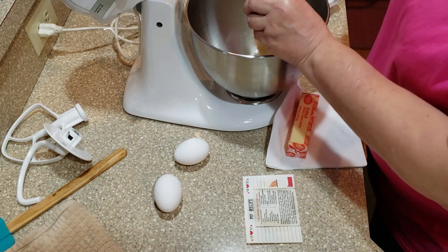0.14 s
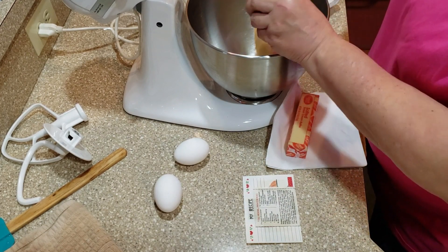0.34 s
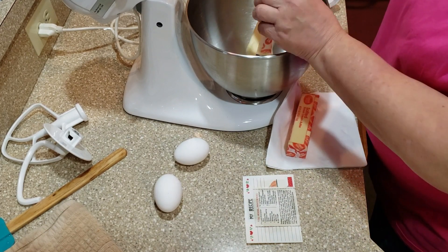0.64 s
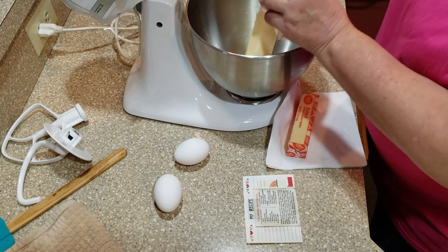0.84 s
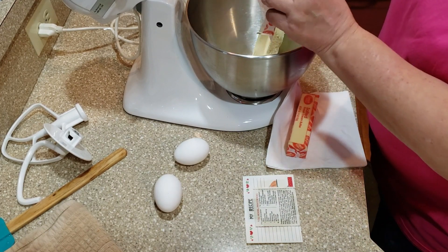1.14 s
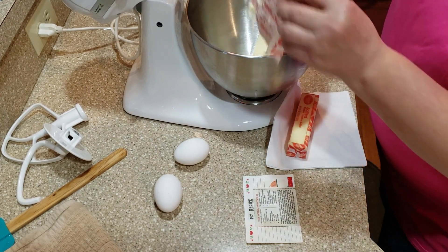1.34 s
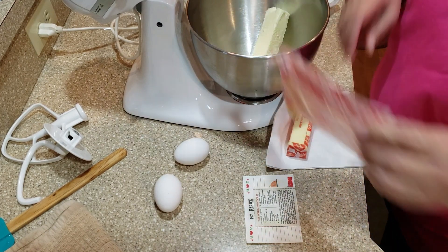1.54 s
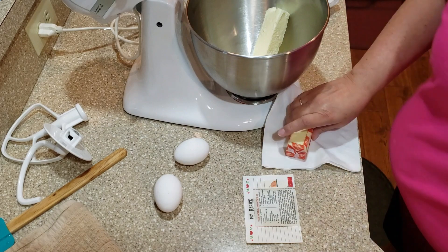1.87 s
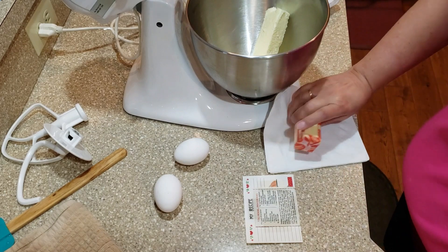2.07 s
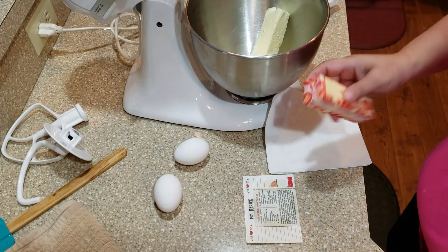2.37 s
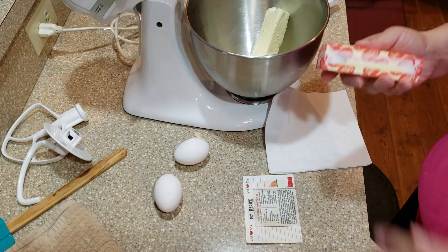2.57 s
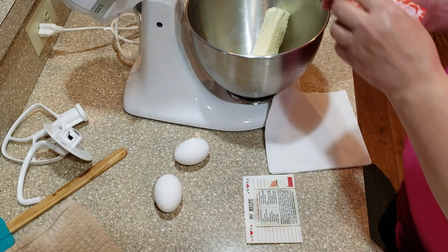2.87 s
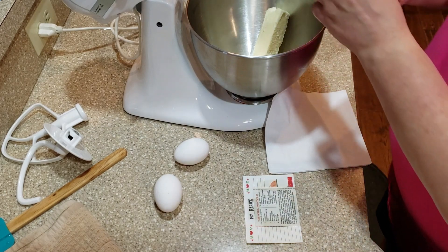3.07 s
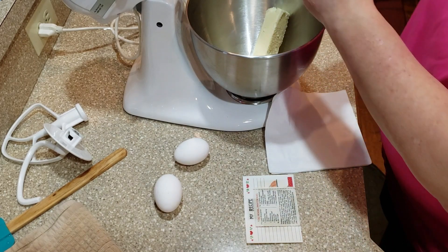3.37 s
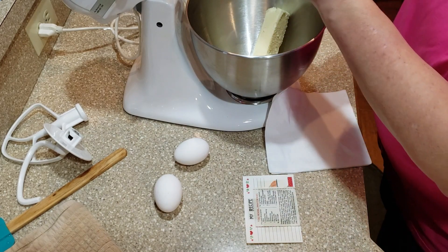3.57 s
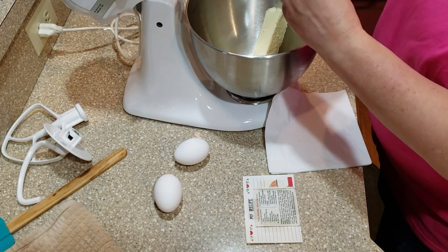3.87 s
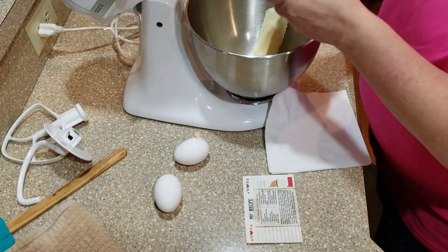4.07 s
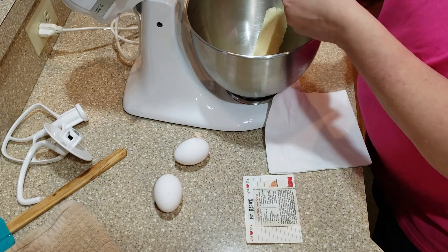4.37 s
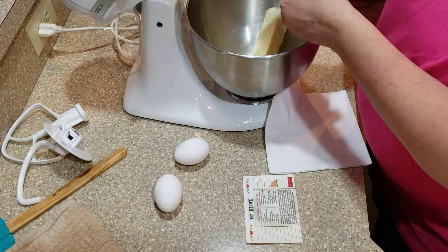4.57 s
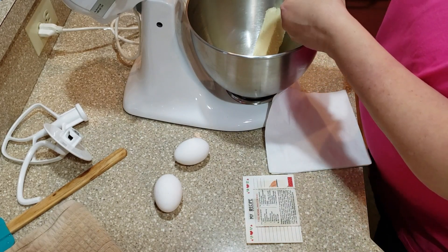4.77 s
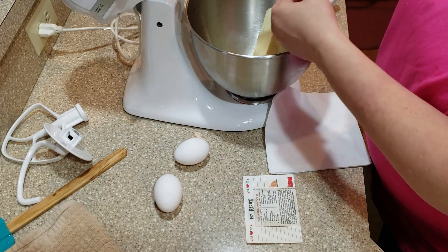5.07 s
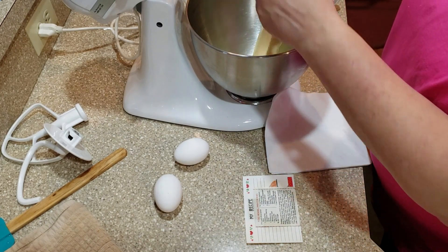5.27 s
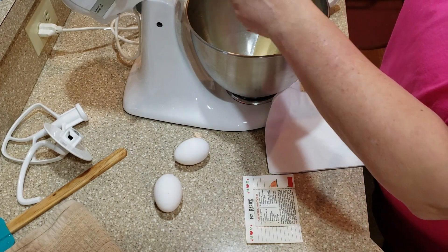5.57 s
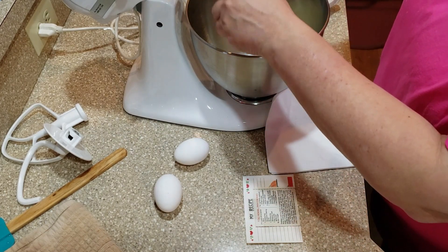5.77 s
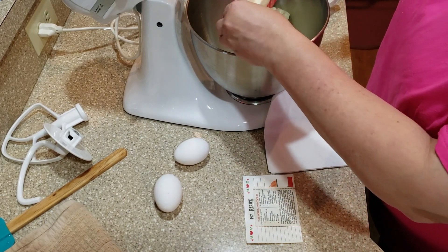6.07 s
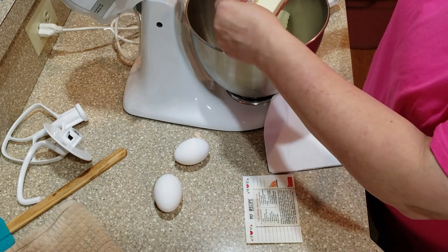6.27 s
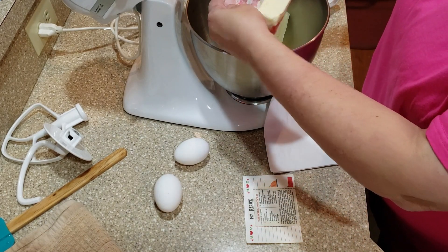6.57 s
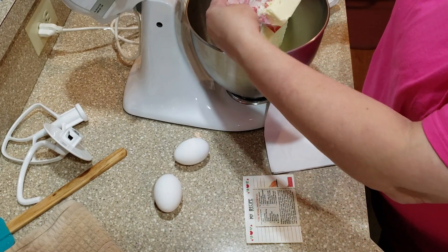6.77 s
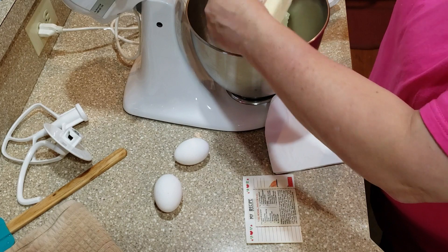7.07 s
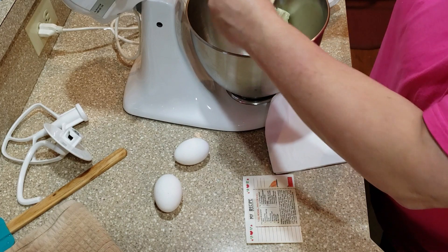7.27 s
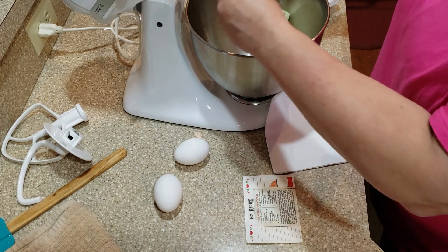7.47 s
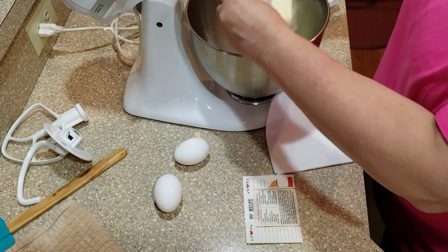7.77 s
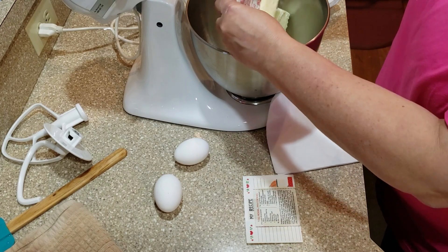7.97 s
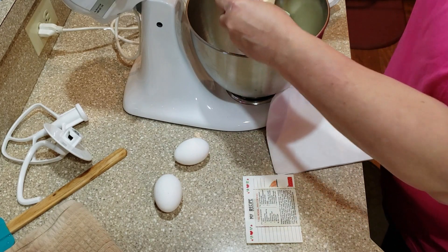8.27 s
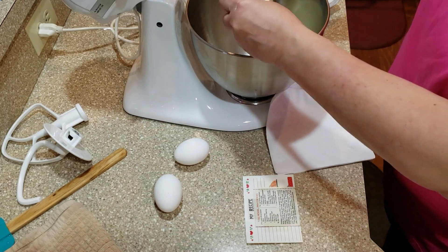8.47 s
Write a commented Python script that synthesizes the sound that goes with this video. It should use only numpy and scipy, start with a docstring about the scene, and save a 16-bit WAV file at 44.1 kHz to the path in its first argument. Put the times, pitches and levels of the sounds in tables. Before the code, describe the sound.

Close by in a small kitchen, a butter wrapper crackles briefly, then eases into a dull bump and light papery swishes. The peeling resumes in irregular bursts of crisp clicks and rustling, with tiny pops as the waxed paper lets go. In the second half the butter nudges a steel bowl several times with soft, hollow knocks. The bowl faintly colours the crinkling, and a low appliance hum runs underneath.

```python
"""Sharp snaps over a fine rustle: waxed paper peeled off butter above a steel mixing bowl.
Creases buckle in bursts of clicks that ring facets, flap the sheet and make the wax fizz.
The paper hisses as it slides and pops off the tacky butter; the stick bumps and knocks the bowl.
The bowl colours the paper, a small kitchen rings briefly and an appliance hums throughout."""
import sys
import numpy as np
from scipy import signal
from scipy.fft import rfft, irfft, next_fast_len
from scipy.io import wavfile

SR = 44100
rng = np.random.default_rng(int(sys.argv[2]) if len(sys.argv) > 2 else 0)


def inscribe(sig):
    """Save sig as 16-bit PCM at rate SR to the path in sys.argv[1].

    A 1-D sig is mono; a 2-D sig holds one channel per row.
    Samples are clipped to [-1, 1] before scaling.
    """
    pcm = np.round(np.clip(np.atleast_2d(sig).T, -1, 1) * 32767)
    wavfile.write(sys.argv[1], SR, pcm.astype(np.int16))


N = 380583
TIME = np.arange(N) / SR

# loudest creases buckling: (time [s], level [dB], facet [Hz], flap [rel dB], fizz [rel dB])
CREASES = [(0.06, -45.5, 1880, -9, -8.5), (0.182, -39.5, 1527, -5.5, -26), (0.192, -37, 1615, -11, -3),
           (0.305, -39.5, 1702, -11, -12), (0.367, -38.5, 985, -13, -18.5), (0.377, -31, 1770, -13, -11),
           (0.614, -34, 3760, -16, -3.5), (0.705, -33.5, 3176, -17, -7), (0.716, -36, 2030, -4, -1),
           (0.739, -38.5, 1330, -5.5, -7), (2.225, -45, 3626, -25, 5.5), (2.233, -42.5, 1890, -7, -20),
           (2.324, -41, 2620, -19, 1), (3.568, -39, 7010, -19.5, 7.5), (3.69, -41.5, 5560, -23, -15),
           (3.756, -38.5, 2617, -15.5, -5), (4.282, -43, 1020, -5, -15), (4.31, -47, 2890, -13, -2),
           (4.453, -40.5, 3820, -34, -8), (4.489, -40, 2675, -9.5, -6.5), (4.772, -47.5, 4100, -16, 6.5),
           (4.801, -40, 4540, -14, -3), (4.813, -43.5, 2990, -10, 0), (4.886, -38.5, 2880, -11.5, -4.5),
           (4.935, -35, 1250, -9.5, -24), (4.958, -37.5, 2920, -3.5, -2.5), (4.971, -37.5, 1010, -5, -4),
           (5.01, -36, 1840, -12, -14), (5.151, -36.5, 1700, -14, -2), (5.359, -34.5, 2345, -13, 0.5),
           (5.372, -38.5, 3584, -7.5, -2), (5.525, -46, 3550, -34, 5.5), (5.583, -48.5, 3430, -20, 1),
           (5.634, -49.5, 3240, -14, 2.5), (6.041, -42, 2850, -18.5, -8), (6.268, -36.5, 3480, -5.5, 1),
           (6.19, -45, 2202, -7.5, -8), (6.637, -35, 1374, -6, -8), (6.65, -49.5, 1910, -5, -3),
           (6.73, -42, 2450, -5, -10), (6.846, -44.5, 2512, -6, -12), (6.934, -37.5, 1850, -12.5, -6),
           (6.951, -37.5, 4040, -9.5, 3), (7.044, -31.5, 1347, -9.5, -3), (7.117, -33, 1520, -10.5, -6.5),
           (7.132, -42, 1980, -15, -4), (7.197, -36, 1196, -23, 1.5), (7.263, -31, 6390, -40, -22.5),
           (7.353, -43, 3700, -4, -5.5), (7.772, -37.5, 4170, -10.5, -2), (7.905, -36, 4037, -10.5, 2.5),
           (8.18, -48, 1803, -9, -5), (8.242, -41, 1918, -12, -1.5), (8.305, -37.5, 1440, -6.5, -15.5),
           (8.386, -38.5, 1690, -13, -4), (8.396, -41, 2100, -14, -6), (8.413, -40.5, 1213, -8, -2.5),
           (8.427, -46, 2004, -12, -4), (8.526, -42.5, 2700, -11.5, -10)]
# wrapper position and sheet pitch: (time [s], left minus right [dB], sheet [Hz], depth in bowl [dB])
WRAPPER = [(1, 4.5, 710, 8.5), (2.2, 1.5, 819.5, 6.5), (3.7, 2.5, 850, -2), (4.5, 3, 400, -11),
           (5.15, 2, 422.3, 0.5), (6, 3, 430, -5)]


def from_db(db):
    """Decibels to gain."""
    return 10 ** (np.asarray(db) / 20)


def unit_rms(x):
    """Scale to rms 1."""
    return x / np.sqrt(np.mean(x ** 2) + 1e-20)


def unit_energy(x):
    """Scale each channel to energy 1."""
    return x / np.sqrt(np.sum(x ** 2, axis=-1, keepdims=True) + 1e-20)


def curves(rows):
    """Interpolate each column over the time in the first."""
    times_s, *columns = np.transpose(rows)
    return [np.interp(TIME, times_s, column) for column in columns]


def band(x, low_hz, high_hz, order=2):
    """Causal band-pass."""
    sos = signal.butter(order, [low_hz, min(high_hz, .45 * SR)], "band", fs=SR, output="sos")
    return signal.sosfilt(sos, x + 1e-18)


def resonate(x, hz, width_hz):
    """Resonator, peak gain 1."""
    r = np.exp(-np.pi * width_hz / SR)
    feedback = [1, -(1 + r * r) * np.cos(2 * np.pi * hz / SR), r * r]
    return signal.lfilter(np.array([1, 0, -1]) * (1 - r * r) / 2, feedback, x + 1e-18)


def drift(rate_hz):
    """Slow random curve, rms 1."""
    knots = rng.standard_normal(int(rate_hz * N / SR) + 2)
    return unit_rms(np.interp(TIME * rate_hz, np.arange(len(knots)), knots))


def coloured_noise(spectrum):
    """Steady noise of a given spectral shape, rms 1."""
    hz, db = np.transpose(spectrum)
    size = next_fast_len(N, real=True)
    bins_hz = np.fft.rfftfreq(size, 1 / SR) + 1
    shape = from_db(np.interp(np.log(bins_hz), np.log(hz), db))
    return unit_rms(irfft(rfft(rng.standard_normal(size)) * shape, size)[:N])


def stereo_noise(size, own_share):
    """White noise; own_share of each ear's power is independent, the rest common."""
    mix = np.c_[np.full(2, np.sqrt(1 - own_share)), np.sqrt(own_share) * np.eye(2)]
    return mix @ rng.standard_normal((3, size))


def pan(x, left_db):
    """Constant-power pan."""
    gains = from_db(np.array([[.5], [-.5]]) * left_db)
    return x * gains / np.sqrt(np.mean(gains ** 2, axis=0))


def add_event(track, sound, start, db):
    """Add a sound with the energy of 10 ms at the given level."""
    track[..., start:start + sound.shape[-1]] += np.sqrt(SR / 100) * from_db(db) * unit_energy(sound)


def gestures(rows, attack_s, release_db_per_s):
    """Build, hold, decay. Returns summed level and power-weighted flap and fizz, in dB."""
    start_s, hold_s, db, flap_db, fizz_db = np.transpose(rows)[..., None]
    steps_s = TIME[::64]
    age_s = steps_s - start_s
    release = from_db(db - release_db_per_s * np.maximum(age_s - hold_s, 0))
    power = (np.clip(age_s / attack_s, 0, 1) * release) ** 2
    total = power.sum(axis=0) + 1e-14
    colour_db = [(power * part_db).sum(axis=0) / total for part_db in (flap_db, fizz_db)]
    return curves(np.column_stack([steps_s, 10 * np.log10(total), *colour_db]))


def appliance(hum_hz=120, waver_db=1.5, rumble_db=-60.0, hiss_db=-72.0):
    """Wavering mains hum over low rumble and faint hiss."""
    # hum with one brief dip: (time [s], level [dB])
    hum_levels = [(0, -53), (2.3, -53.5), (2.43, -59), (2.6, -54), (8.6, -52)]
    # room noise spectra: (frequency [Hz], density [rel dB])
    rumble_spectrum = [(20, -30), (40, -12.5), (75, 5), (105, -8), (290, -10), (450, -28), (1000, -46.5)]
    hiss_spectrum = [(400, 9), (1000, -1), (5000, -13), (6700, -5.5), (8500, -17.5), (13000, -10.5)]
    db, = curves(hum_levels)
    hum = np.sqrt(2) * np.sin(2 * np.pi * hum_hz * TIME) * from_db(db + waver_db * drift(5))
    rumble = from_db(rumble_db + db - np.median(db)) * coloured_noise(rumble_spectrum)
    hiss = from_db(hiss_db) * np.array([coloured_noise(hiss_spectrum) for _ in range(2)])
    return pan(hum + rumble, 2.3) + hiss


def fingers():
    """Fingers tug the wrapper and hold it between tugs: level, flap and fizz curves."""
    # tugs, then soft holding: (start [s], length [s], level [dB], flap [rel dB], fizz [rel dB])
    tugs = [(-0.03, 0.12, -51, -5, -15.5), (0.15, 0.16, -52, -5.5, -13), (0.5, 0.26, -55.5, -3.5, -11.5),
            (0.79, 0.14, -58.5, -1.5, -9), (2.218, 0.095, -47.5, -9.5, -1), (3.42, 0.35, -58.5, -10.5, 0.3),
            (3.69, 0.25, -54.5, -13, -4), (4.25, 0.07, -49, -10, -2.5), (4.76, 0.23, -50.5, -10.5, -5),
            (5.04, 0.11, -56.5, -10, -21), (5.35, 0.063, -51, -18, -16.5), (5.88, 0.091, -59, 4.5, -17),
            (6.03, 0.33, -54, -14, -4.5), (6.56, 0.17, -55.5, -3.5, -4), (6.92, 0.3, -50.5, -5.5, -8),
            (7.75, 0.21, -56, -2.5, -13), (8.21, 0.35, -55, -1.5, -3.5)]
    holds = [(4.034, 1.5, -63, -4.08, -3.5), (6.05, 3, -61, -1.4, -3.5)]
    return gestures(tugs + holds, attack_s=0.012, release_db_per_s=204)


def bending_facets(x, patchy_db=4.0, rate_hz=24, count=10):
    """As the sheet bends, one facet after another leads and the friction shifts colour."""
    return sum((-1) ** k * resonate(x, hz, hz / 4) * from_db(patchy_db * drift(rate_hz))
               for k, hz in enumerate(np.geomspace(1150, 6700, count)))


def mic_presence_peak(clicks, hz=6650, width_hz=1500):
    """Soft, narrow microphone peak near 6.7 kHz that brightens clicks and hiss."""
    return 0.2 * resonate(resonate(clicks, hz, width_hz), hz, width_hz)


def rustle(motions, grains_per_s=6000, size_db=2.7, clump_db=3.5):
    """Moving paper hisses with tiny buckles, most weak, a few strong. Returns sheet, facets, wax."""
    flapping, sliding, fizzing = sum(from_db([db + flap_db, db, db + fizz_db])
                                     for db, flap_db, fizz_db in motions)
    fires = rng.random(N) < grains_per_s / SR
    sizes = from_db(size_db * np.minimum(rng.exponential(1, N), 4))
    grains = unit_rms(fires * sizes * stereo_noise(N, own_share=1.0))
    clicks = grains * from_db(clump_db * drift(70))
    sheet = unit_rms(band(clicks.mean(axis=0), 133, 1370)) * np.ones((2, 1))
    facets = unit_rms(band(resonate(bending_facets(clicks), 1480, 8200), 1290, 8700, order=4))
    wax = unit_rms(band(clicks, 9000, SR) + 2 * mic_presence_peak(clicks))
    return np.array([sheet * from_db(-3.5) * flapping,
                     facets * from_db(-4.0) * sliding,
                     wax * from_db(-2.5) * fizzing])


def loud_creases(base_width_hz=7000):
    """Rows for snaps(); a crisper crack excites a broader facet resonance."""
    return [(s, db, hz, base_width_hz * from_db(0.92 * min(fizz_db, 3)), flap_db, fizz_db)
            for s, db, hz, flap_db, fizz_db in CREASES]


def small_creases(handling, tries_per_s=56, facet_hz=2700, width_hz=1700, buckle_db=-63.5):
    """Rows for snaps(); small creases give way at random once the paper is bent hard enough."""
    count = int(tries_per_s * N / SR)
    pitch_dev, level_dev, flap_dev, fizz_dev, load_dev = rng.standard_normal((count, 5)).T
    at = rng.integers(0, N, count)
    db, flap_db, fizz_db = (curve[at] for curve in handling)
    buckles = db - np.maximum(fizz_db, 0) + 2 * load_dev > buckle_db
    tautness_db = 0.59 * (fizz_db + 7.5)   # taut, fizzing paper ticks higher
    hz = np.clip(facet_hz * from_db(7.53 * pitch_dev + tautness_db), 1000, 6200)
    tick_db = db - 2.5 + 2.5 * np.clip(level_dev, -2, 2)
    rows = np.c_[at / SR, tick_db, hz, np.full(count, width_hz),
                 flap_db + 2 * flap_dev, fizz_db - 2.5 + 2 * fizz_dev]
    return rows[buckles]


def panels(clicks, facet_hz, q=15, spread_db=5.0, count=3):
    """Stiff panels beside a crease ring briefly: one at the facet pitch, the rest scattered."""
    others_hz = np.clip(facet_hz * from_db(spread_db * rng.standard_normal(count)), 900, 7000)
    return unit_energy(sum(unit_energy(resonate(clicks, hz, hz / q)) / np.sqrt(k + 1)
                           for k, hz in enumerate(np.r_[facet_hz, others_hz])))


def snaps(rows, lead_ms=2.04, trail_ms=2.4, scatter_db=-17.0, scatter_ms=18.0, ring_db=-7.5):
    """A crease gives way in an avalanche of clicks. Returns sheet flap, facet ring, wax fizz."""
    out = np.zeros((3, 2, N + SR))
    before, after = int(.01 * SR), int(.03 * SR)
    ms = np.arange(-before, after) / SR * 1000
    _, sheet_hz, _ = curves(WRAPPER)
    highpass = signal.butter(2, 9800, "high", fs=SR, output="sos")
    scatter = from_db(scatter_db) * np.exp(-np.abs(ms) / scatter_ms) * (ms > 0)   # off the steel walls
    for s, db, hz, width_hz, flap_db, fizz_db in rows:
        start = max(round(s * SR) - before, 0)
        slowness = (hz / 2000) ** -.4   # big, low facets give way more slowly
        swell = np.exp(-np.abs(ms) / (slowness * np.where(ms < 0, lead_ms, trail_ms)))
        avalanche = swell * (rng.random(len(ms)) < .45)
        clicks = unit_energy((avalanche + scatter) * stereo_noise(len(ms), own_share=0.66))
        crack = 0.3 * (ms == 0) / slowness
        flap_hz = sheet_hz[start] * from_db(1.8 * rng.standard_normal())   # a different part each time
        push = clicks.mean(axis=0)
        flap = resonate(push, flap_hz, flap_hz / 2) + 0.24 * resonate(push, 1.84 * flap_hz, flap_hz / 2)
        sheet = band(flap, 235, 1050)
        facet = unit_energy(band(resonate(clicks + crack, hz, width_hz), 1000, 7400, order=5))
        facet += from_db(ring_db) * panels(clicks, hz)
        wax = signal.sosfilt(highpass, clicks + 1.36 * crack) + 1.2 * mic_presence_peak(clicks)
        for layer, sound, gain_db in zip(out, (sheet, facet, wax), (flap_db, 0, fizz_db - 2.0)):
            add_event(layer, sound, start, db + gain_db)
    return out[..., :N]


def settling(rise_s=0.0026, wake_db=-17.5):
    """The sheet rustles on after each loud snap: level, flap and fizz curves."""
    wakes = [(s, rise_s, db + wake_db, flap_db, fizz_db) for s, db, _, flap_db, fizz_db in CREASES]
    return gestures(wakes, rise_s, release_db_per_s=222)


def pops(puff_s=0.0016, q=7, overtone_ratio=1.69, overtone_db=-7.5):
    """Soft, hollow pops: a short puff rings a brief note with a fainter overtone."""
    # soft pops: (time [s], level [dB], pitch [Hz])
    soft_pops = [(0.456, -49.5, 2350), (0.581, -47.5, 1826), (3.877, -52, 1194), (4.842, -45.5, 1360),
                 (6.607, -44, 1310), (7.537, -46, 2583), (7.6, -48, 1200)]
    out = np.zeros(N + SR)
    age_s = TIME[:SR // 20]
    for s, db, hz in soft_pops:
        puff = rng.standard_normal(len(age_s)) * age_s * np.exp(-age_s / puff_s)
        low, high = (unit_energy(resonate(puff, f, f / q)) for f in (hz, hz * overtone_ratio))
        add_event(out, low + from_db(overtone_db) * high, round(s * SR), db)
    return out[:N]


def butter_bumps():
    """Soft butter bumps and rubs dully, with no click."""
    # contacts of butter and hand: (time [s], level [dB], band [Hz], rise [s], t60 [s])
    contacts = [(0.975, -52, 51.9, 0.0049, 0.52), (1.469, -61, 880, 0.0067, 0.5),
                (1.95, -61, 2100, 0.12, 0.76), (5.681, -47, 87.4, 0.19, 1.6)]
    out = np.zeros(N)
    for s, db, hz, rise_s, t60_s in contacts:
        age_s = np.maximum(TIME - s, 0)
        noise = unit_rms(band(rng.standard_normal(N), hz * 0.57, hz * 1.14))
        out += noise * (1 - np.exp(-age_s / rise_s)) * from_db(db - 60 * age_s / t60_s)
    return out


def slides(grain_db=1.0):
    """Paper slides over skin and butter; the hiss follows hand speed. Returns dull, bright."""
    # smooth strokes: (middle [s], length [s], level [dB], dull part [rel dB])
    strokes = [(1.4, 0.41, -72.5, -7), (1.77, 0.18, -66, -10.5), (2.079, 0.15, -68, -14),
               (2.271, .012, -38, -16), (2.747, 0.16, -67.5, -14), (3.142, 0.018, -53, -19),
               (3.263, 0.042, -46.5, -21), (3.449, 0.025, -38.5, -18), (4.229, 0.18, -50, -2),
               (5.564, 0.16, -55, 0), (5.752, 0.05, -54.5, -17)]
    middle_s, length_s, db, dull_db = np.transpose(strokes)[..., None]
    steps_s = TIME[::64]
    swells = from_db(db) * np.exp(-2 * ((steps_s - middle_s) / length_s) ** 2)
    dull_swells = swells * from_db(dull_db)
    bright_gain, dull_gain = curves(np.c_[steps_s, swells.sum(axis=0), dull_swells.sum(axis=0)])
    friction = rng.standard_normal((2, N)) * from_db(grain_db * drift(90))
    bright = unit_rms(band(friction, 10900, SR) + 9.7 * mic_presence_peak(friction))
    dull = unit_rms(band(bending_facets(friction), 1520, 6100))
    return dull * dull_gain, bright * bright_gain


def knocks(hz=465, width_hz=45, spread_db=1.2):
    """The stick nudges the bowl wall: a soft push rings a short, hollow note of varying pitch."""
    # stick against bowl: (time [s], level [dB])
    nudges = [(4.836, -47.5), (4.935, -46), (4.959, -43), (5.031, -44), (6.647, -40.5), (6.75, -48.5),
              (6.846, -50), (7.047, -42.5), (7.186, -47), (7.419, -50.5), (7.77, -40)]
    out = np.zeros(N + SR)
    push = np.r_[np.hanning(SR // 600), np.zeros(SR // 8)]
    for s, db in nudges:
        note = resonate(push, hz * from_db(spread_db * rng.standard_normal()), width_hz)
        add_event(out, note, round(s * SR), db)
    return out[:N]


def bowl(x, depth_db, shading=0.24):
    """The bowl rings along; depth shifts the balance of its modes and the rim shades the direct sound."""
    # bowl resonances: (frequency [Hz], width [Hz], gain [dB], gain per depth [dB/dB])
    modes = [(493, 22, 3, 0.12), (797, 78, -5.5, -0.14), (940.7, 33, -10, 0.9), (1109, 42, -6, 0.77),
             (1332.5, 43.1, -12, -1.6), (1580, 61, -11, 0.78), (1743, 96, -7, 0.75), (1958, 41, -10, -0.48),
             (2319, 80, -15.5, 0.7969)]
    direct = x * from_db(-shading * np.maximum(depth_db, 0))
    ring = sum(from_db(db) * resonate(x * from_db(slope * depth_db), hz, width_hz)
               for hz, width_hz, db, slope in modes)
    return from_db(-1.5) * (direct + ring)


def kitchen(x, t60_s=0.38, delay_s=0.0024, top_hz=10400):
    """Dense, decaying reflections, different at each ear."""
    age_s = TIME[:int(t60_s * SR)]
    tail = rng.standard_normal((2, len(age_s))) * from_db(-60 * age_s / t60_s) * (age_s > delay_s)
    response = unit_energy(band(tail, 130, top_hz, order=1))
    return signal.fftconvolve(x, response, axes=-1)[:, :N]


def scene(room_db=-10.0):
    """Paper heard through bowl and kitchen, over the hum; its fizz beams to the right."""
    left_db, _, depth_db = curves(WRAPPER)
    handling = fingers()
    creases = np.vstack([loud_creases(), small_creases(handling)])
    sheet, facets, wax = snaps(creases) + rustle([handling, settling()])
    dull, bright = slides()
    low = pan(sheet + knocks(), 0.55 * left_db)
    middle = pan(facets + dull + pops(), left_db + 1.3)
    high = pan(wax + bright, left_db - 5.0)
    near = bowl(low + middle + high, depth_db) + pan(butter_bumps(), 3.5)
    return near + from_db(room_db) * kitchen(near) + appliance()


def record(dry, cutoff_hz=16100):
    """Steep low-pass."""
    return signal.sosfilt(signal.ellip(10, .2, 80, cutoff_hz, fs=SR, output="sos"), dry)


dry = scene()
out = record(dry)
inscribe(out)
```